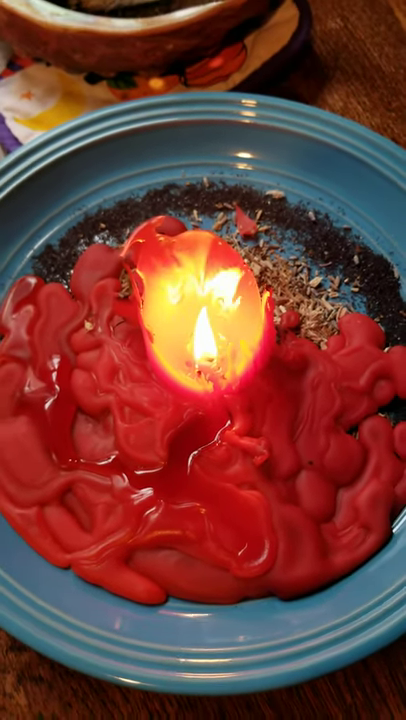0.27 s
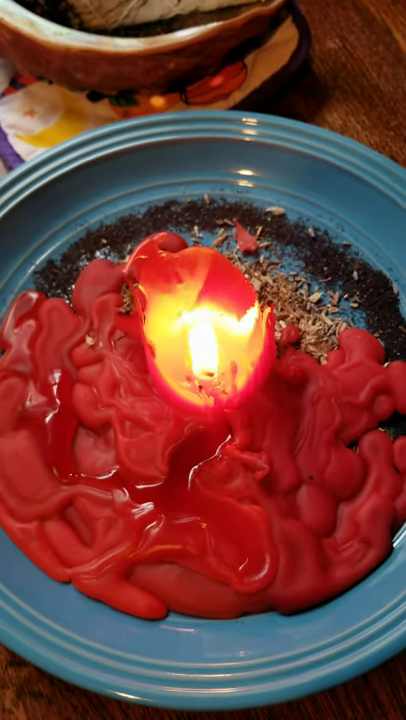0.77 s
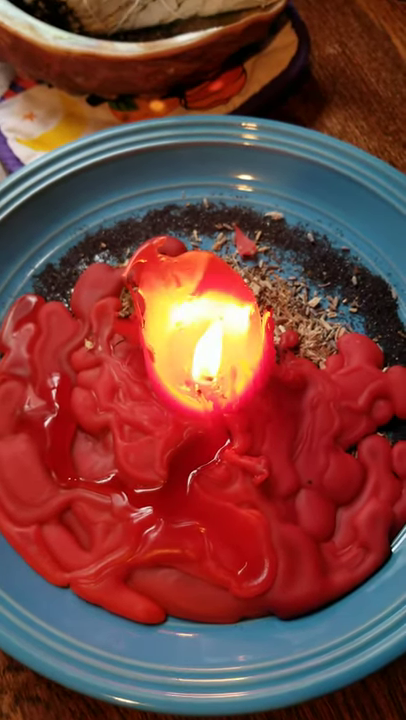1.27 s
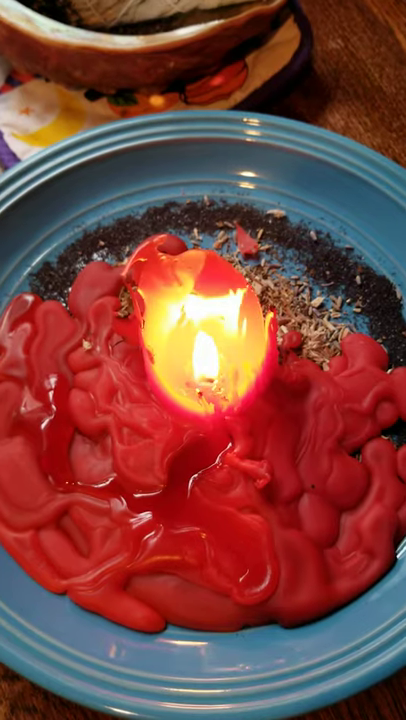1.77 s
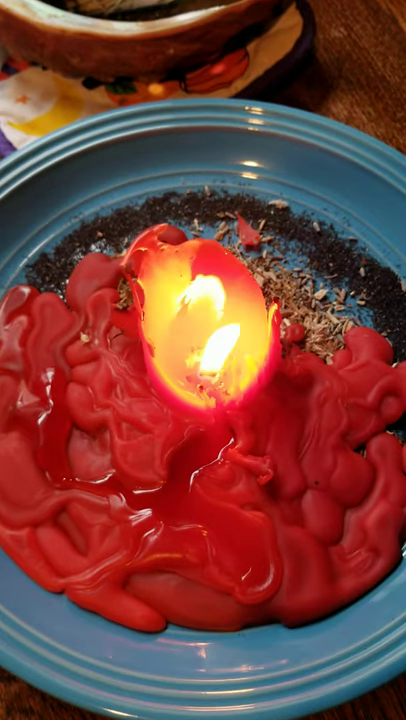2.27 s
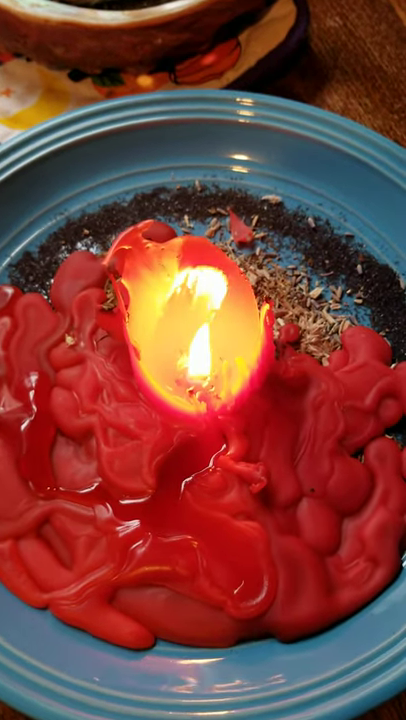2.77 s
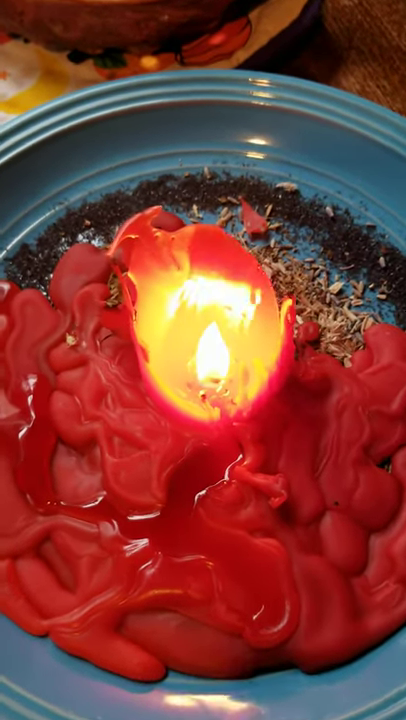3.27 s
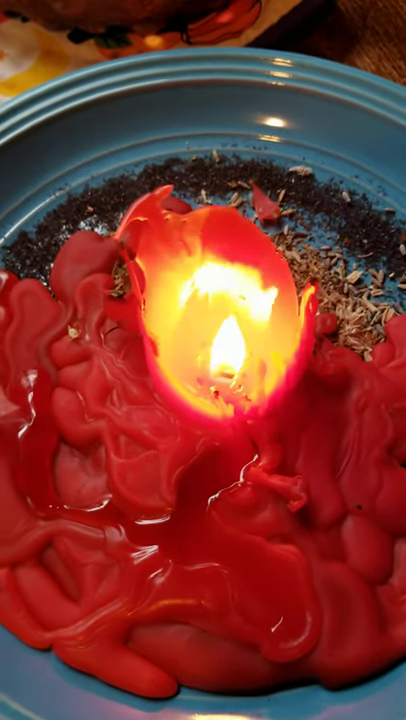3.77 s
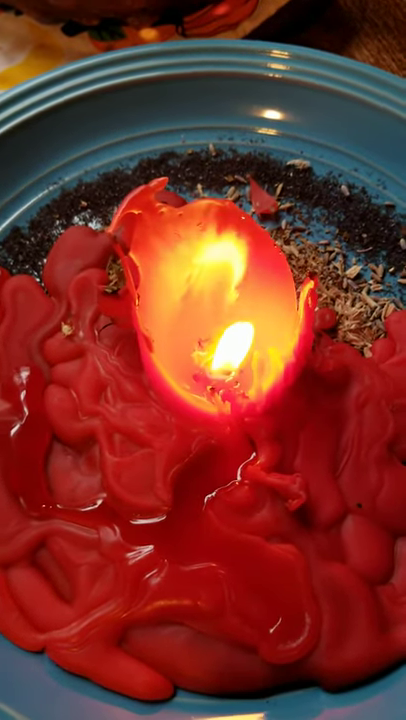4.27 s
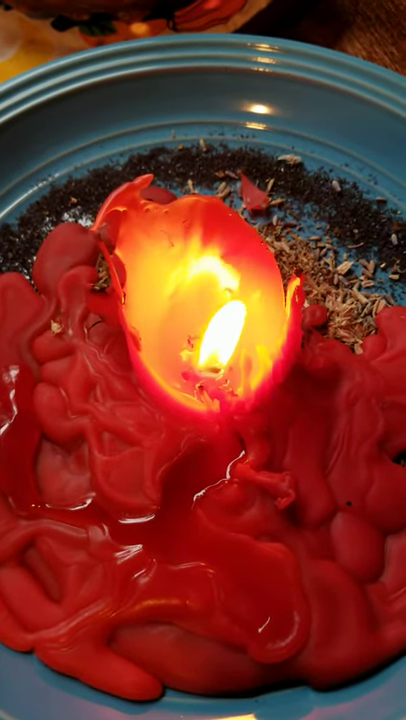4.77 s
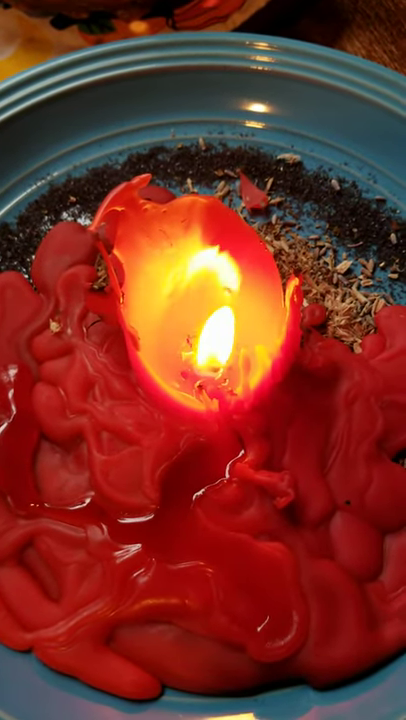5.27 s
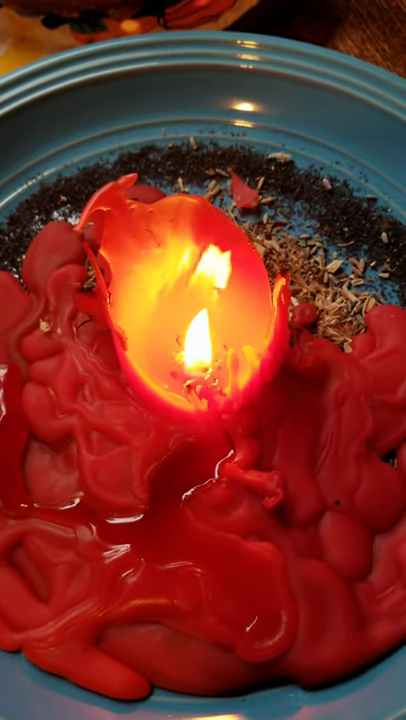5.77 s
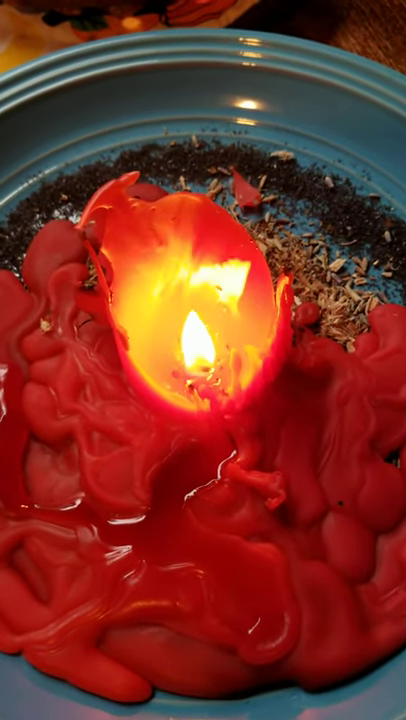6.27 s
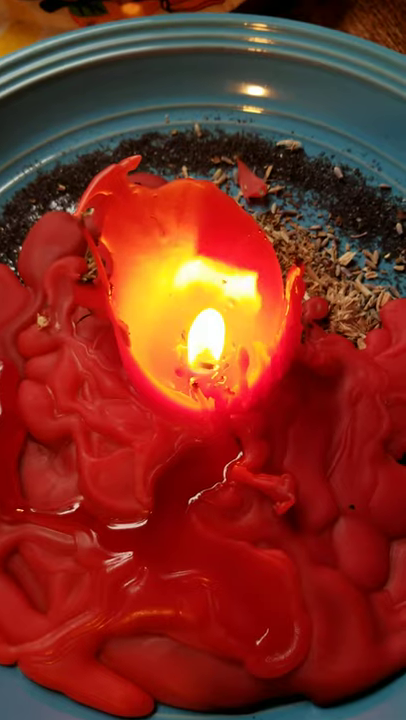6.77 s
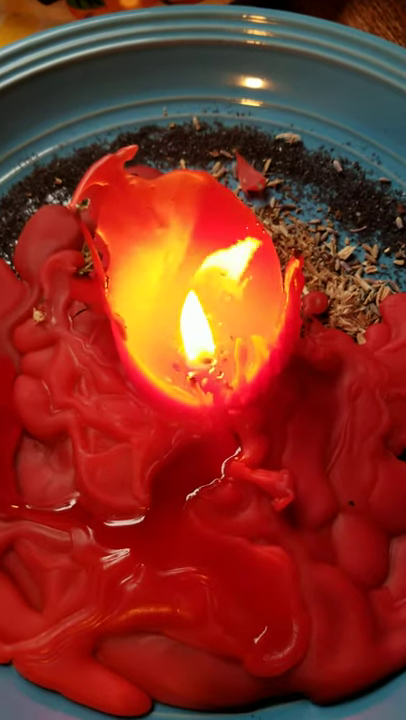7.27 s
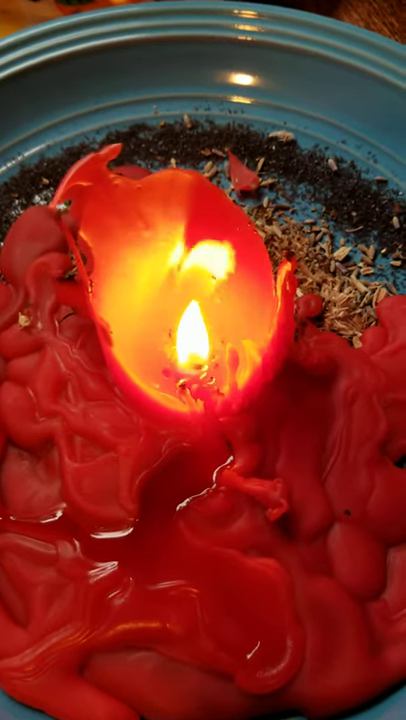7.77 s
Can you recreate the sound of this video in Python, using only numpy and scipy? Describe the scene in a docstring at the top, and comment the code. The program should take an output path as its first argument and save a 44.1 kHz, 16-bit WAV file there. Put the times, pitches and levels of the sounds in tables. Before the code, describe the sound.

A candle flame in melted wax on a dish, heard very close in stereo in a quiet room. Faint low rumble and hum with soft hiss continue throughout, wavering slightly. Near silence until 0.76 s, when a sharp snap cracks, followed by small ticks and another clear snap at 1.04 s. Weaker clicks come around 1.24 and 1.5 s, one with a soft thud at 2.17 s, then a long lull. A tight cluster snaps at 3.49 s; from 3.8 s loud pops crowd together, strongest around 3.95 s, and at about 4.1 s a bright, spitting sizzle erupts. Through 5.6 s it fluctuates, with hollow bubbling pops, sharp cracks and low sputters. Around 5.7-6.4 s it thins to scattered crackles, then gathers again with snaps near 6.7 s and a gush at 7.05 s, sputtering unevenly to 8 s. Short, dry, faint room tail.

```python
"""A pool of melted candle wax on a dish, heard close up by two small microphones in a quiet room.
From the outset there is filtered-noise rumble, a low hum of two sine waves, and microphone hiss.
Single bubbles then burst at the wick: each snap is an impulse with spatter, a ringing cavity and a thud.
The snaps crowd together as the pool boils up into a sizzle of random impulses, which ebbs and returns.
The wax walls scatter the treble, the dish returns one echo, and the room adds a faint diffuse tail."""
import sys
import numpy as np
from scipy import signal
from scipy.fft import rfft, irfft, next_fast_len
from scipy.io import wavfile
from scipy.ndimage import map_coordinates

SR = 44100
rng = np.random.default_rng(int(sys.argv[2]) if len(sys.argv) > 2 else 0)


def wav_out(sig):
    """Save sig, one row per channel (or a flat mono array), as 16-bit PCM at SR to the path in sys.argv[1]."""
    wavfile.write(sys.argv[1], SR, np.round(np.clip(np.atleast_2d(sig).T, -1, 1) * 32767).astype(np.int16))


N = 353241
TIME = np.arange(N) / SR


def amp(db):
    """Level law: decibels to amplitude gain."""
    return 10 ** (np.asarray(db) / 20)


def unit(x):
    """Normalisation: scale to an rms of 1."""
    return x / np.sqrt(np.mean(x ** 2) + 1e-20)


def along(points, hz):
    """Spectral interpolation: each column after the frequency, read on a logarithmic axis."""
    knots_hz, *columns = np.transpose(points)
    return np.array([np.interp(np.log(hz + 1), np.log(knots_hz + 1), column) for column in columns])


def curves(rows):
    """Linear interpolation in time: one value per sample for each column after the time."""
    knots_s, *columns = np.transpose(rows)
    return [np.interp(TIME, knots_s, column) for column in columns]


def wobble(rate):
    """Band-limited fluctuation: a smooth curve through random knots, rate of them a second."""
    knots = rng.standard_normal(int(N * rate / SR) + 4)
    return map_coordinates(knots, [TIME * rate])


def filtered(x, response):
    """Linear filtering: the spectrum of x times a complex response of frequency."""
    size = 2 * next_fast_len((N + SR // 2) // 2)
    hz = np.fft.rfftfreq(size, 1 / SR)
    return irfft(rfft(x, size) * response(hz), size)[..., :N]


def causal(db):
    """Minimum phase: the response with these gains that rings only after it is struck."""
    cepstrum = irfft(np.log(amp(db)))
    half = cepstrum.shape[-1] // 2
    # fold the part before time zero onto the part after it
    cepstrum[..., 1:half] *= 2
    cepstrum[..., half + 1:] = 0
    return np.exp(rfft(cepstrum))


def band(x, hz, kind, order=2):
    """Causal Butterworth filtering: a high- or low-pass."""
    sos = signal.butter(order, min(hz, SR / 2 - 1), kind, fs=SR, output="sos")
    return signal.sosfilt(sos, x)


def sides(db):
    """Stereo level difference: left and right gains, left above right by db."""
    return amp(np.outer([.5, -.5], db))


def resonance(x, hz, width_hz):
    """Damped oscillation: one mode, which rings longer the narrower its bandwidth."""
    return signal.lfilter(*signal.iirpeak(hz, hz / width_hz, fs=SR), x)


def push(x, low_hz, high_hz, body_hz=380, body_width_hz=350, body_db=-9):
    """Low-frequency part of a burst: a band-limited puff of vapour and a resonant knock of wax on the dish."""
    puff = band(band(x, high_hz, "low"), low_hz, "high")
    return puff + amp(body_db) * resonance(x, body_hz, body_width_hz)


# Bursting bubbles that stand out singly, before the overall trims in pops:
# (time [s], crack level [dB], cavity ring over the crack [dB], low thud over the crack [dB])
SINGLE_BURSTS = [(0.7629, -19, 1.0, -7.0), (0.7649, -14, -4, -11), (0.7715, -0.5, 0.5, -14.5),
                 (0.7915, -9, -15, -21), (0.802, -19.0, -8, -20.0), (0.8908, -22.5, -1, -22),
                 (0.9152, -10.5, -9, -37), (0.935, -22, -6, -24), (0.9634, -29, -3, -20.0),
                 (0.996, -26, 6, -20.0), (1.0129, -20, 2, -20.0), (1.0388, -2, -5.5, -46),
                 (1.048, -25, 0, -20.0), (1.2393, -13.5, -7, -25), (1.2414, -10.5, -6, -21),
                 (1.461, -18.5, -6, -16.0), (1.508, -29, -4.0, -20.0), (1.525, -25, -7, -22),
                 (1.5451, -18, -20, -27.0), (1.5696, -29.0, -3.0, -20.0), (1.6683, -30, -11, -20.0),
                 (2.1652, -7.5, -3.5, -2), (2.2624, -28, 0, 3), (2.318, -31.0, 1.5, -2),
                 (2.783, -32.5, -1.0, -20.0), (3.4883, -15.5, -9, -8), (3.491, -6, -22, -7),
                 (3.494, -1.5, -16, -9), (3.4986, -11, -7, -22), (3.6333, -8, -10, -12.5),
                 (3.663, -24.5, 1, -6), (3.7191, -29.5, 1, -23), (3.813, 0, -7, 2), (3.818, -12.5, 7, 4),
                 (3.8319, -9, -8, 4.5), (3.8736, -20, -9.0, 5), (3.8892, -1.5, -20, -2.5),
                 (3.9219, -1, -8.0, -13), (3.926, 3, -1, -20), (3.937, 7, -17, -22),
                 (3.9478, -20, -2, -18.0), (3.952, 4, -5, -9), (3.967, -2, -5.0, -3), (3.979, -3, -9, 1),
                 (3.989, -17, -8.0, -21.0), (4.0212, -4, 1.5, -2.5), (4.0432, -18, -7, -2),
                 (4.0532, -1, -9, -6), (4.0848, 2.5, -1.5, -6.5), (4.141, -10, 11, -9), (4.1654, -7, 6, -2),
                 (4.181, -8.5, 9, 5), (4.2351, -6, 1, -12), (4.3425, -9, 7, -18), (4.3942, -11, -14, -25.0),
                 (4.491, -7, 7.5, -1.5), (4.5617, -8.5, 3.5, -21.0), (4.5808, -8.5, 2, -14),
                 (4.6109, -12, 3, -7), (4.6208, -9.5, 3, -22.0), (4.7162, -5, -7.0, -2),
                 (4.7519, -3.5, -4, -3), (4.7872, -15, -1, -6), (4.824, -10.5, 10, -6),
                 (4.833, -5.5, 3, -11), (4.935, -11, 8.5, -16.0), (4.9795, -5, -5, -2),
                 (5.0429, -12, 5, -1.0), (5.121, 0, -2, -22), (5.1559, -4.5, 4, 0.0),
                 (5.186, -6.5, 4.5, -1), (5.2185, -2, -11.0, 0.0), (5.2602, -16, -3, -4),
                 (5.294, -9, 6.5, -1.5), (5.304, -10, -7, -20), (5.341, -4.5, -18.0, -23),
                 (5.42, -9, 7.0, 2), (5.435, -9.5, 2, -9), (5.469, -8.5, -17, -3), (5.483, -3, -12, -3),
                 (5.5179, -7.5, 4.0, 1), (5.5464, -14.0, -10.0, -15), (5.628, -13.5, 2, -3),
                 (5.6843, -21, -7, -21.0), (5.72, -13.5, -14, -28), (5.7367, -11, -22, -32),
                 (5.9311, -21.0, -5.0, -24), (5.9357, -13.5, 1, -10), (5.9417, -7, -5.0, -15.0),
                 (6.1051, -6, -9, -18.0), (6.125, -25, 4.0, -11.0), (6.1568, -12, -15.0, -19),
                 (6.1615, -5.5, -4.0, -22.0), (6.1702, -23, -3, -30.0), (6.1835, -5, 1.5, -8.5),
                 (6.1928, -18, -8, -7), (6.2251, -12, -19, -11), (6.2852, -20.5, -1, -8),
                 (6.3009, -14, -9, -20), (6.4724, -24, 9, -8), (6.4877, -20.0, -1, -2.0),
                 (6.5268, -18.0, -16, -10), (6.547, -20, -17, -14), (6.566, -14.5, -26, -27.0),
                 (6.62, -8, -12, -5), (6.6296, -11, -6, -7), (6.6514, -12.0, -9.0, -12.0),
                 (6.6821, -6.5, -9, -18), (6.7103, -11, -12, -4), (6.7189, 0, -19, -15),
                 (6.7773, -9, 3, -6.0), (6.8292, -6, -2, -6), (6.836, -10.0, -15, -23.0),
                 (6.88, -12, -10, -1), (6.9099, -6, -18.0, -0.5), (6.9689, -10, -17, 0),
                 (7.074, -9, -12, -1), (7.0974, -13, -21.0, -20), (7.1212, -8, -1.0, 0),
                 (7.1889, -10, -9, -19.0), (7.1956, -4, -20, -0.5), (7.241, -14.5, -8, 7),
                 (7.2599, -10.0, -15, -12), (7.3241, -6, -14, -25), (7.3301, -10.5, 2.5, -7),
                 (7.3643, -22.5, -4, 12), (7.41, -6, 0.5, -4.5), (7.551, -8, -14, -26.0),
                 (7.6834, -13, -4, -18), (7.768, -11.5, -1, -5.0), (7.8663, -10, -17.0, -18),
                 (7.95, -7, 5, -3.5), (7.9597, -7, -5, -6), (7.992, -14.5, -7.0, 3.5)]
# Colour of a snapping wax film: (frequency [Hz], gain on the still pool [dB], gain once it boils up [dB])
FILM_COLOUR = [(510, -72, -64), (1570, -17, -22.5), (2040, -6, -8), (3210, -6, -7.5), (4070, -22.5, -8.5),
               (6330, -11.5, -8), (8600, -5, -5.5), (12000, -4.5, -5), (13800, -0.5, -3), (15800, 3, -8.5)]
STILL_UNTIL_S = 3.7


def pops(cavity_hz=2080, cavity_width_hz=1400, ring_db=-2, froth_db=5, cushion_db=-1.0,
         thud_db=-4.5, pan_db=1.0, pan_spread_db=2):
    """Impulsive excitation: a film snaps, its rim spatters and its cavity rings, cushioned by froth."""
    tear_db, tear_t60_s, thud_top_hz = -8, .009, 680
    size_spread, lag_spread_s = .13, 9e-6  # spread of log pitch; spread of delay between the ports
    t = np.arange(SR // 20) / SR
    hz = np.fft.rfftfreq(2 * len(t), 1 / SR)
    still, boiling_up = causal(along(FILM_COLOUR, hz))
    froth = np.clip((curves(BOIL_CURVE)[0] + 55) / 16, 0, 1)
    out = np.zeros((2, N + SR))
    for time_s, crack_db, ring_rel_db, thud_rel_db in SINGLE_BURSTS:
        at = round(time_s * SR)
        pitch = np.exp(size_spread * np.clip(rng.standard_normal(), -2, 2))

        # the film's snap, followed by the decaying spatter of its torn rim
        ragged_db = 4.5 * rng.standard_normal(len(t))
        spatter = rng.standard_normal(len(t)) * amp(ragged_db - 60 * t / tear_t60_s)
        spatter /= np.linalg.norm(spatter)
        tear = amp(tear_db + froth_db * froth[at]) * spatter
        snap = amp(crack_db + cushion_db * froth[at]) * ((t == 0) + tear)

        # a small random arrival difference between the two ports
        lag_s = lag_spread_s * rng.standard_normal()
        lag = np.exp(1j * np.pi * hz * lag_s * [[1], [-1]])
        colour = still if time_s < STILL_UNTIL_S else boiling_up
        crack = irfft(rfft(snap, 2 * len(t)) * colour * lag)[:, :len(t)]

        cavity = band(resonance(snap, cavity_hz * pitch, cavity_width_hz), 1400, "high", order=3)
        thud = push(snap, 75, thud_top_hz, body_hz=330 * pitch, body_width_hz=107, body_db=-2)
        place = sides(pan_db + pan_spread_db * rng.standard_normal())
        bright = place * (crack + amp(ring_db + ring_rel_db) * cavity)
        out[:, at:at + len(t)] += bright + amp(thud_db + thud_rel_db) * thud
    return out[:, :N]


# Slow course of the boil at the wick, before the overall trims in sizzle:
# (time [s], strength [dB], low sputter over the strength [dB])
BOIL_CURVE = [(4.06, -83, -4), (4.11, -35.5, 3.5), (4.36, -35, -4), (4.44, -41.5, 4.5), (4.7, -41.5, 1),
              (4.93, -37, 6), (5.08, -42, 3.5), (5.29, -35, 0.5), (5.35, -57, 5), (5.5, -40, 3.5),
              (5.69, -60, -5), (6.06, -61.5, -6), (6.5, -51, -4.5), (6.62, -45.5, -4), (6.78, -51, -6),
              (7.08, -40, 5), (7.3, -46.5, 8), (8.01, -43, -1)]
# Short gushes of vapour: (time of peak [s], strength [dB], low sputter over the strength [dB])
VAPOUR_GUSHES = [(1.005, -54, -7), (3.938, -40.5, 13), (4.129, -33.5, 0), (4.18, -43, -3),
                 (4.358, -32.5, -14), (4.857, -41, 11.5), (5.23, -40, -7), (5.568, -40, 6),
                 (5.944, -43.5, -1), (6.191, -49.5, -10), (6.418, -46, 10.5), (6.84, -38, 3),
                 (7.049, -34, 5.5)]
GUSH_RISE_S, GUSH_T60_S = 0.056, 0.11  # times for a 60 dB rise and a 60 dB decay


def boiling():
    """Power addition: strength of boil and low sputter, in dB, from the slow swell plus each gush."""
    strength_db, low_db = curves(BOIL_CURVE)
    begun = TIME > BOIL_CURVE[0][0]
    power = begun * amp([strength_db, strength_db + low_db]) ** 2
    for peak_s, gush_db, low_rel_db in VAPOUR_GUSHES:
        rise = (peak_s - TIME) / GUSH_RISE_S
        decay = (TIME - peak_s) / GUSH_T60_S
        fade_db = -60 * np.clip(np.maximum(rise, decay), 0, 2)
        power = power + amp([[gush_db], [gush_db + low_rel_db]]) ** 2 * amp(fade_db) ** 2
    return 10 * np.log10(power)


def bursts(rate, spread_db):
    """Poisson-like shot noise: impulses at random moments, rate a second, many small and a few large."""
    happens = rng.random(N) < rate / SR
    size_db = spread_db * np.minimum(rng.standard_normal(N), 2)
    sign = rng.choice([-1, 1], N)
    return unit(happens * sign * amp(size_db) / np.sqrt(rate))


def cavities(rate, spurts, count=8):
    """Cavity resonance: middling bubbles of many sizes, each damped within a few cycles at its own pitch."""
    low_hz, high_hz, sharpness, spread_db = 250, 1900, 2.5, 6  # sharpness: the quality factor
    total = 0
    for hz in np.geomspace(low_hz, high_hz, count):
        struck = spurts * bursts(rate / count, spread_db)
        total = total + resonance(struck, hz, hz / sharpness) * np.sqrt(low_hz / hz)
    return total


# Where the sizzle sits as the camera drifts: (time [s], left minus right [dB])
SIZZLE_PLACE = [(4.2, 0), (6, -1.5), (6.8, 2), (8, 1.5)]
# Colour of the tiny bursting bubbles: (frequency [Hz], gain [dB])
BUBBLE_COLOUR = [(300, -40.5), (800, 0), (1300, -4.5), (2000, 4), (2550, -2.5), (3300, -1.5), (4100, 0.5),
                 (9000, 0), (11800, -1), (14000, -3), (16000, 7.5)]


def sizzle(level_db=-2, sputter_db=-5):
    """Modulated shot noise: tiny bubbles burst in spurts, denser in a harder boil, over a low sputter."""
    base_rate, spread_db = 1350, 6.2  # bursts a second at a strength of -42.5 dB; spread of their sizes
    spurt_db, surge_db, fizz_db, cavity_db = 2.3, .7, -8, -2
    strength_db, low_db = boiling()
    density = base_rate * amp(.7 * np.clip(strength_db + 42.5, -12, 6))
    spurts = unit(amp(spurt_db * np.minimum(wobble(170), 2) + surge_db * wobble(20)))

    bubbles = bursts(density, spread_db)
    fizz = amp(fizz_db) * rng.standard_normal(N)  # the smallest bubbles merge into noise
    froth = spurts * (bubbles + fizz)
    coloured = filtered(froth, lambda hz: causal(along(BUBBLE_COLOUR, hz)))
    crackle = sides(curves(SIZZLE_PLACE)[0]) * coloured

    puffs = push(spurts * bursts(density / 3, spread_db=5.0), low_hz=85, high_hz=1630)
    sputter = puffs + amp(cavity_db) * cavities(density / 2, spurts)
    return amp(strength_db + level_db) * crackle + amp(low_db + sputter_db) * sputter


def crater(x, scatter_db, above_hz=4100):
    """Diffuse scattering: ragged wax walls turn treble into fresh noise, different toward each port."""
    scatter_s = .0008  # smoothing time of the energy
    treble = filtered(x, lambda hz: 1 - 1 / (1 + (hz / above_hz) ** 10))
    keep = np.exp(-1 / (scatter_s * SR))
    energy = signal.lfilter([1 - keep], [1, -keep], treble ** 2)
    scattered = band(np.sqrt(energy) * rng.standard_normal((2, N)), above_hz, "high", order=10)
    return x + amp(scatter_db) * scattered


def dish(x, delay_s=0.001151, echo_db=-16):
    """Specular reflection: the dish returns one early echo, which combs the spectrum."""
    return filtered(x, lambda hz: 1 + amp(echo_db) * np.exp(-2j * np.pi * hz * delay_s))


# The room's answer: (frequency [Hz], decay time to -60 dB [s], level [dB])
ROOM_DECAY = [(250, 0.17, -10), (885, 0.21, -7.5), (1990, 0.17, -6), (3040, 0.15, -8), (4500, 0.3, -11),
              (8200, 0.19, -10.5), (15100, 0.12, -13)]


def room(x):
    """Diffuse reverberation: noise decays at a rate set by frequency, independently at each port."""
    hz, t, cells = signal.stft(rng.standard_normal((2, SR // 2)), SR, nperseg=256)
    t60_s = along(ROOM_DECAY, hz)[0][:, None]
    tail = signal.istft(cells * amp(-60 * t / t60_s), SR, nperseg=256)[1]
    wet = signal.fftconvolve(x, tail / np.linalg.norm(tail[0]), axes=1)[:, :N]
    return filtered(wet, lambda hz: amp(along(ROOM_DECAY, hz)[1]))


# Colour of the two microphone ports: (frequency [Hz], left gain [dB], right gain [dB])
PORT_COLOUR = [(100, 3.9, 1.7), (400, 2, 0), (700, -5.5, -4), (1200, 0, -8.5), (1650, -2, -6),
               (1850, -8, 2), (2150, -1, 3.5), (2800, 7.5, 6.5), (3800, -2.5, 1), (4500, 1.5, -3),
               (5250, 0, -9.5), (5900, -1.5, -3), (6800, -3, -3.5), (7400, 0.5, -6), (8500, -2.5, -7.5),
               (10800, -2, -4), (11500, 1.5, 2.5), (12400, 1, 3), (14500, -2, -1.5), (15500, 0, -3),
               (16000, -5, -7)]
# The left port's phase lead, turning over at the port resonance: (frequency [Hz], lead [rad])
PORT_LEAD = [(50, 0), (300, 0.15), (900, 0.9), (1650, 0.2), (2100, 2.4), (2450, 3.1), (3600, 3.1),
             (4000, 5.3), (4550, 5.6), (4900, 4.3), (5500, 3.8), (7200, 6.3), (9000, 5), (11800, 7.8),
             (13000, 8), (14300, 9.6), (15600, 10.8)]


def ports(direct, diffuse):
    """Interaural-style phase: direct sound alone keeps a lead between ports; each port colours all it hears."""
    turned = filtered(direct, lambda hz: np.exp(1j * along(PORT_LEAD, hz) * [[.5], [-.5]]))
    return filtered(turned + diffuse, lambda hz: causal(along(PORT_COLOUR, hz)))


# Relative spectrum of the room rumble: (frequency [Hz], density [dB per Hz])
RUMBLE_COLOUR = [(12, -40), (20, -25), (38, -6), (59, -4.5), (86, -9), (119, -4), (150, -9.5), (189, -20.5),
                 (216, -20), (387, -33), (574, -43), (1200, -44), (1560, -79), (2640, -120)]
# Hum of an appliance, before the trim hum_db: (frequency [Hz], level over the drone curve [dB])
HUM_TONES = [(58.7, -3), (118.2, -10)]
# Drone curve shared by rumble and hum, before their trims: (time [s], level [dB])
DRONE_LEVEL = [(0, -61), (0.6, -64), (1, -58), (1.4, -63.5), (1.8, -61), (2.55, -62.5), (2.68, -64.5),
               (3.5, -63.5), (4.1, -62), (5.9, -62.5), (7.5, -59), (8, -58)]
# Relative spectrum of the microphone hiss: (frequency [Hz], left [dB], right [dB])
HISS_COLOUR = [(293, 4.5, 4.5), (1250, -2, -2), (2000, 11, -2.5), (2640, 4.5, -5), (3910, 0.5, -10.5),
               (5000, -9.5, -12), (9700, -10.5, -17), (10100, -3, -14), (12550, 4, 0), (16500, -8.5, -11)]


def background(rumble_db=-3.0, hum_db=-0.64, hiss_db=-70, apart_db=-13):
    """Coherence: rumble and hum are nearly alike at both ports, while microphone hiss is unrelated."""
    waver_db, wander_rad = 1.4, .8
    drone_db = curves(DRONE_LEVEL)[0] + waver_db * wobble(10)

    noise = rng.standard_normal((2, N))
    mid, side = filtered(noise, lambda hz: amp(along(RUMBLE_COLOUR, hz)))
    rumble = amp(rumble_db) * unit(mid + amp(apart_db) * side * [[1], [-1]])

    hum = 0
    for hz, tone_db in HUM_TONES:
        level = amp(hum_db + tone_db + 0.59 * wobble(7.8))
        phase = 2 * np.pi * hz * TIME + wander_rad * wobble(8)
        hum = hum + level * np.sqrt(2) * np.sin(phase)

    hiss = unit(filtered(rng.standard_normal((2, N)), lambda hz: amp(along(HISS_COLOUR, hz))))
    return sides(3.0) * amp(drone_db) * (rumble + hum) + amp(hiss_db) * hiss


def scene(snaps_wet_db=0.0, boil_wet_db=-4):
    """Superposition: direct, reflected and background sound add; the sizzle lies deeper in the crater."""
    snaps, boil = pops(), sizzle()
    near = crater(snaps, scatter_db=-7) + crater(boil, scatter_db=-4)
    reverberant = room(amp(snaps_wet_db) * snaps + amp(boil_wet_db) * boil)
    return ports(dish(near), reverberant) + background()


TOP_HZ = 15900


def record(dry):
    """Band limitation: the camera keeps nothing at or above its upper frequency limit."""
    return filtered(dry, lambda hz: hz < TOP_HZ)


dry = scene()
out = record(dry)
wav_out(out)
```